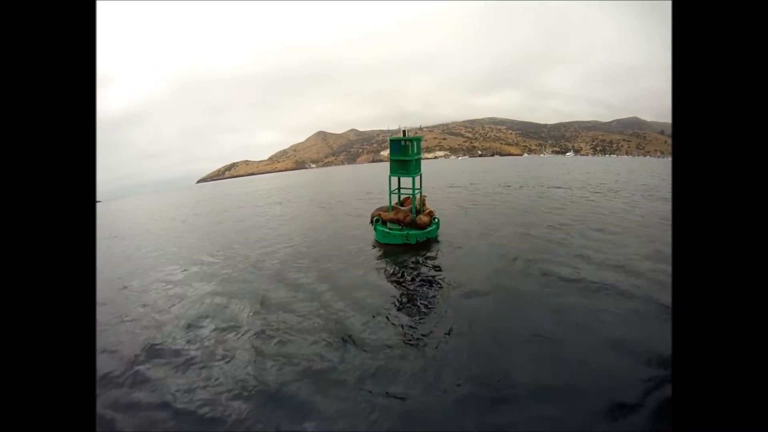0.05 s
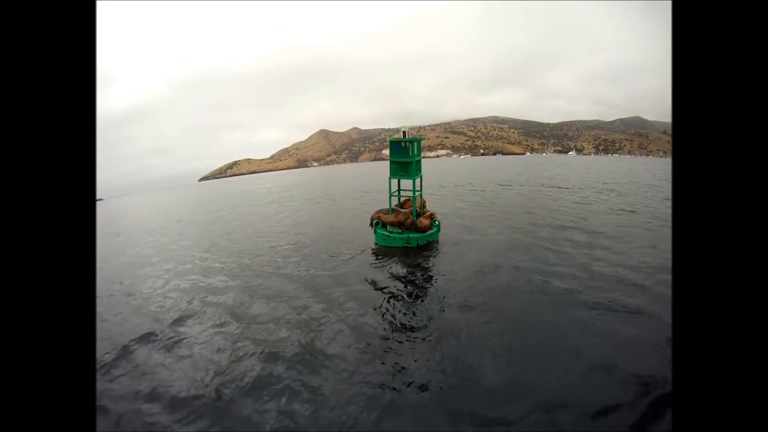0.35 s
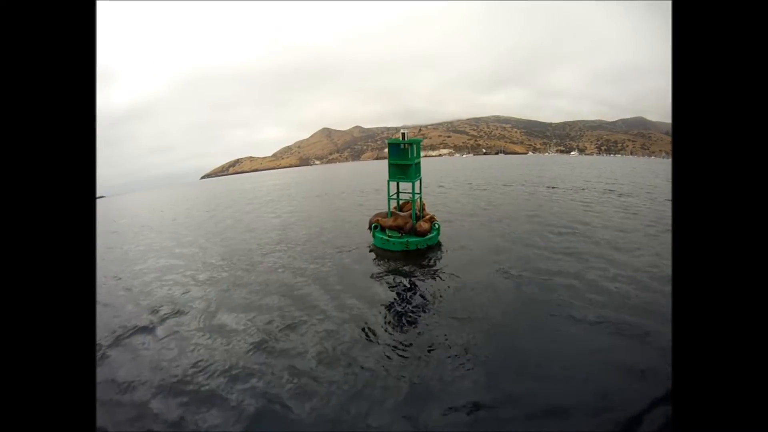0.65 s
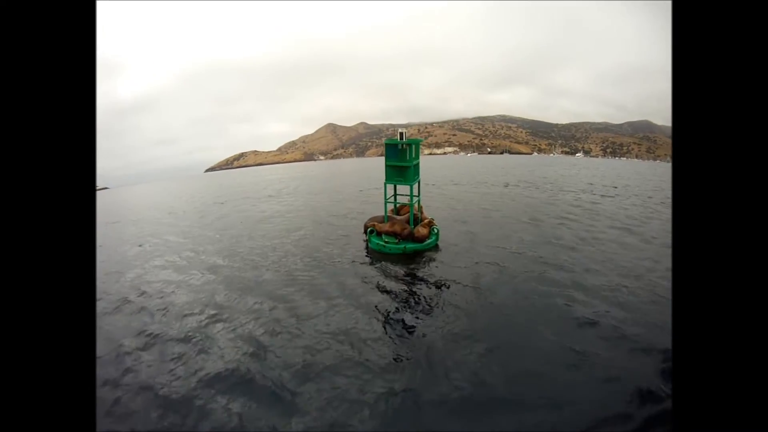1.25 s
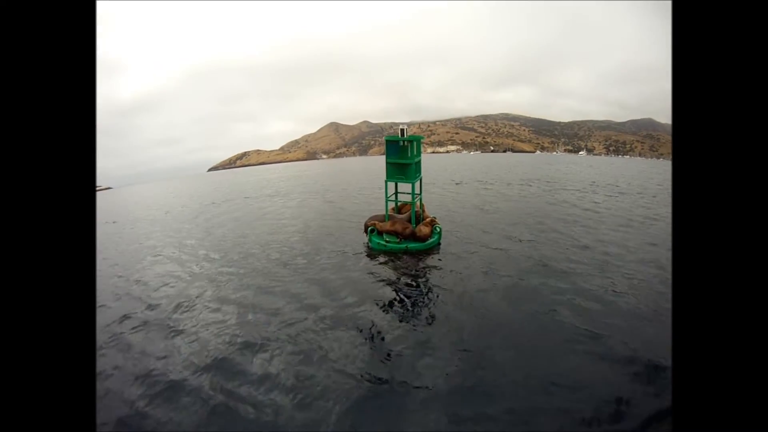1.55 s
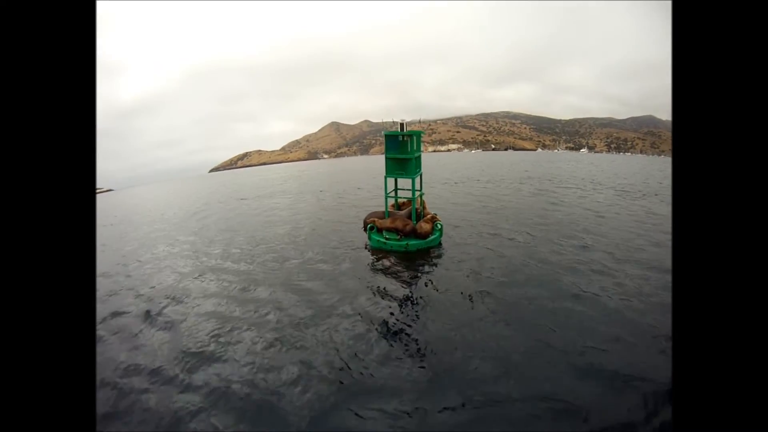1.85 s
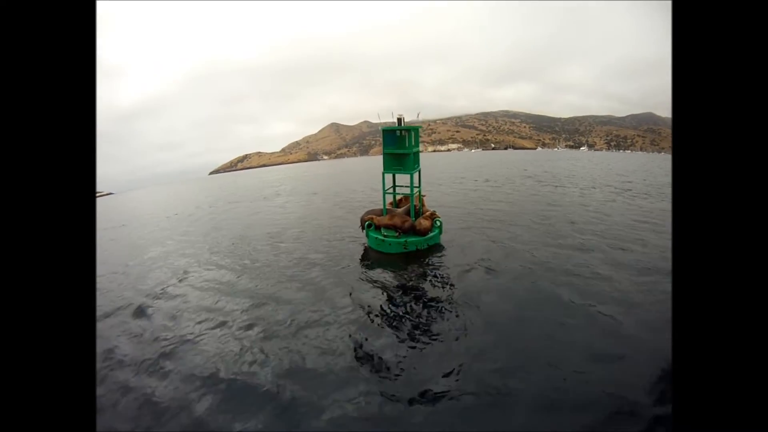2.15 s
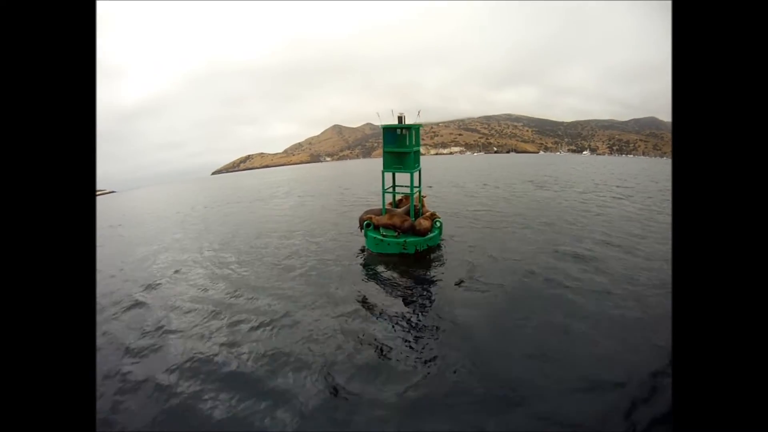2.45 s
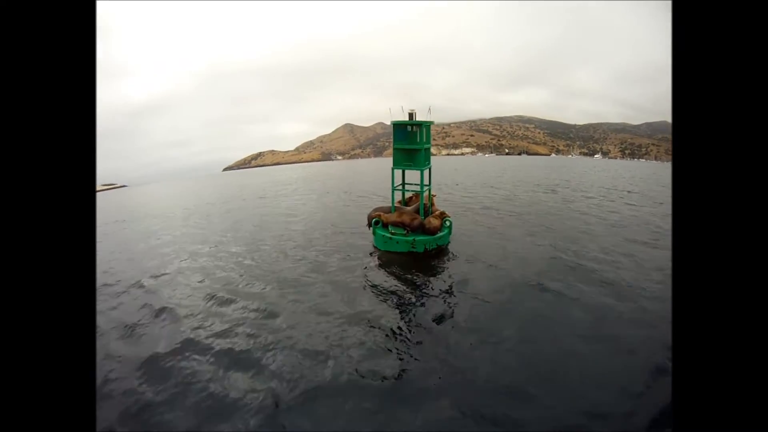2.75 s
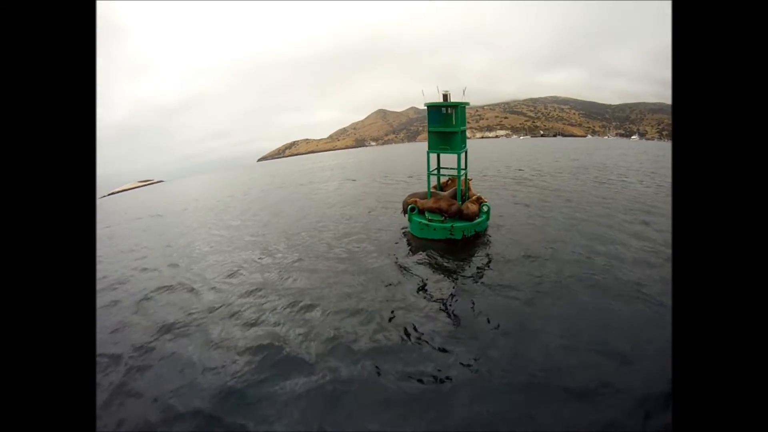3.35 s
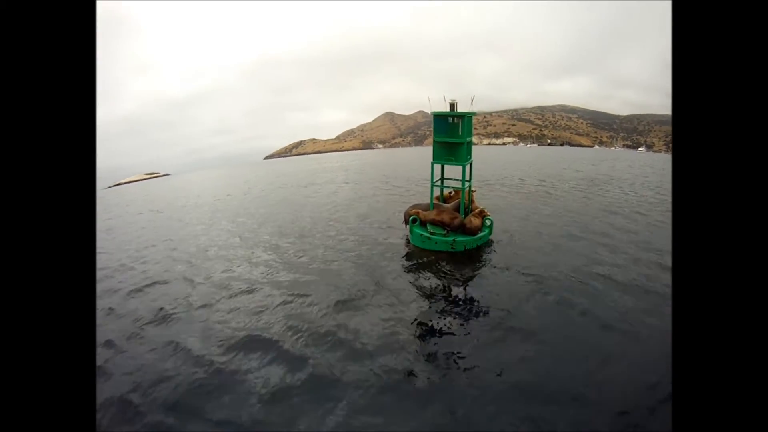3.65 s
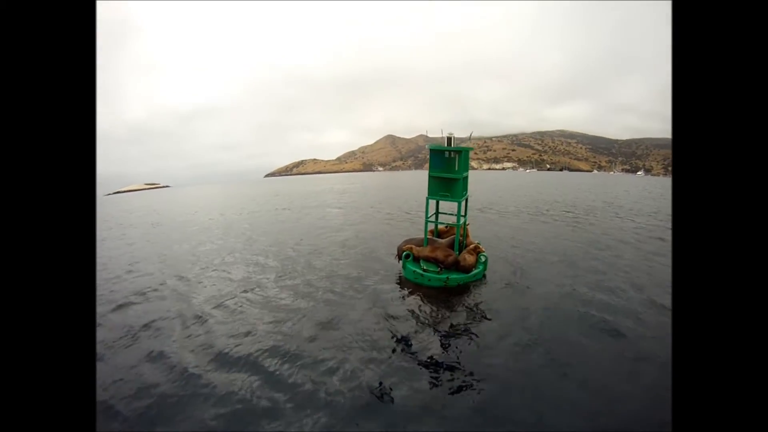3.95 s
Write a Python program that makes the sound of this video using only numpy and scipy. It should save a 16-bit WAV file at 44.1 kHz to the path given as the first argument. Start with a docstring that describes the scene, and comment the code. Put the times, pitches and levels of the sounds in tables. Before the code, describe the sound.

Sea lions bark from a buoy across calm water: five short barks, with a deeper animal joining twice. Then louder knocks, scrapes and thumps come from handling right at the microphone, over a faint hum and wash of water and wind.

```python
"""Sea lions on a buoy, heard across calm water: one gives five barks that dip in pitch, and a deeper
one joins in twice. Their jittering vocal folds and rasping breath are shaped by throat and mouth.
Right at the microphone the camera mount hums at a low resonance; near the end a hand shifts on it,
and the housing knocks, scrapes and thumps. A quiet wash of water and wind lies behind it all.
The recorder holds each sample at a low rate, which mirrors every sound faintly into the treble."""
import sys
import numpy as np
from scipy import signal
from scipy.fft import rfft, irfft, next_fast_len
from scipy.io import wavfile

SR = 44100
rng = np.random.default_rng(int(sys.argv[2]) if len(sys.argv) > 2 else 0)


def transcribe(u):
    """Save the signal u as a 16-bit wav file named by the first command-line argument.

    u: samples, shape (n,) or (channels, n), limited to [-1, 1]; the rate is SR.
    q: integer samples, one column per channel.
    """
    v = np.clip(np.atleast_2d(u).T, -1, 1)
    q = np.round(v * 32767).astype(np.int16)
    wavfile.write(sys.argv[1], SR, q)


N = 176400
TIME = np.arange(N) / SR

# Resonances of a sea lion's throat. Each row: frequency in Hz, relative gain in dB.
THROAT_RESPONSE = [(300, -19), (700, -27), (920, 5.5), (1150, 5), (1300, 3), (1420, -8.5), (1690, -21),
                   (1880, -3), (2400, -3.5), (2750, -16), (3720, -13.5), (4700, -27)]


def sea_lions():
    """Both animals out on the buoy, with a faint scatter from buoy and water."""
    # Each row: start and length in seconds, lowest pitch in Hz, opening drop as a share of that pitch,
    # lower band level, fundamental level, open-mouth gain and treble gain in dB, release and time of
    # the sag in seconds, sag and rasp in dB, time of the shrill edge in seconds, its level in dB.
    barks = [(0.829, 0.098, 484.5, 0.21, -35.5, -44, -0.5, -11.5, 0.049, 0.84, -11, -34, .83, -72),
             (1.183, 0.18, 451.8, 0.32, -43, -48.5, 4, -5.5, 0.053, 1.29, 0, -11.5, 1.29, -64),
             (1.586, 0.23, 458.6, 0.22, -40, -46.5, 9, -1, 0.061, 1.695, -3, -15.5, 1.627, -52),
             (2.001, 0.175, 448.8, .39, -39.5, -42.5, -3, -2, 0.046, 2.078, -3, -14, 2.115, -59),
             (2.432, 0.17, 438.8, .34, -44.5, -44.5, 2.5, 2.5, 0.028, 2.51, -4, -11.5, 2.46, -56.5)]
    # Each row: start and length in seconds, lowest pitch in Hz, level in dB, mouth resonance in Hz.
    deep_calls = [(0.784, 0.087, 358.4, -33.5, 1097), (1.694, 0.19, 373.8, -43.5, 685)]
    calls = np.zeros(N)
    for row in barks:
        add(calls, *bark(*row))
    for row in deep_calls:
        add(calls, *deep_call(*row))
    scatter_db, scatter_t60_s = -13.5, 0.23
    t = TIME[:SR // 2]
    tail = rng.standard_normal(len(t)) * amp(-60 * t / scatter_t60_s)
    return calls + amp(scatter_db) * signal.fftconvolve(calls, tail / np.linalg.norm(tail))[:N]


def bark(start, length, low_hz, drop, db, chest_db, open_db, treble_db,
         release_s, sag_s, sag_db, rasp_db, edge_s, edge_db):
    """The pitch drops and climbs again; the opening mouth moves weight from fundamental to overtones."""
    t = np.arange(0, length, 1 / SR)
    attack_s, flare_s, split_hz, rolloff_hz = 0.014, 0.027, 1700, 2740

    def gate(lag_s):
        ramp = np.minimum((t - lag_s) / attack_s, (length - lag_s - t) / release_s)
        return np.sin(np.pi / 2 * np.clip(ramp, 0, 1)) ** 2

    bottom = 0.35  # share of the bark gone by at its lowest pitch
    past = t / length - bottom
    fall = drop * abs(past / bottom) ** 1.9
    rise = 0.42 * abs(past / past.max()) ** 1.5
    partials, waves, puffs = vocal_folds(low_hz * (1 + np.where(past < 0, fall, rise)))
    mouth = bell(past, 0.15)
    sag = sag_db * bell(start + t - sag_s, flare_s)  # the voice sags and leaves its rasp
    chest = amp(chest_db - 16 * mouth) * waves[0]
    shrill = unit_rms(colour(puffs, lambda f: bell(f - 3717, 100)))
    edge = amp(edge_db) * bell(start + t - edge_s, flare_s) * shrill
    out = gate(0) * (chest + edge)
    # The treble opens later, shuts earlier and sags further than the band below the split.
    lower = (-2.9, db, 0.0025, sag + open_db * mouth, rasp_db)
    treble = (0.3, db + treble_db, 0.011, 4.3 * sag, rasp_db + 4.5)
    for slope, band_db, lag_s, voice_db, breath_db in (lower, treble):
        throat = lambda f: gain_at(THROAT_RESPONSE, f) * (1 + np.tanh(slope * (f - split_hz) / 80))
        gains = throat(partials) / np.hypot(1, (partials / rolloff_hz) ** 4)
        voice = amp(voice_db) * (gains * waves).sum(0) / np.linalg.norm(gains, axis=0)
        breath = amp(breath_db) * unit_rms(colour(puffs, throat))
        out += amp(band_db) * gate(lag_s) * (voice + breath)
    return start, out


def deep_call(start, length, low_hz, db, mouth_hz):
    """A rounder call that also dips in pitch; the mouth picks out one harmonic over a light rasp."""
    progress = np.arange(0, length, 1 / SR) / length
    partials, waves, puffs = vocal_folds(low_hz * (1 + 0.112 * (2 * progress - 1) ** 2))
    mouth = 1 / (1 + ((partials - mouth_hz) / 187) ** 4)
    upper = amp(-16) / (1 + ((partials - 2207) / 290) ** 4)
    chest = amp(-17.5) * (low_hz / partials) ** 2
    voice = unit_rms(((mouth + upper + chest) * waves).sum(0))
    rasp = amp(-12.5) * unit_rms(colour(puffs, lambda f: gain_at(THROAT_RESPONSE, f)))
    return start, amp(db) * np.sin(np.pi * progress) ** 0.69 * (voice + rasp)


def vocal_folds(hz):
    """Jittering folds: the frequencies and waves of twelve harmonics, and a puff of air per cycle."""
    size, harmonics = len(hz), np.arange(1, 13)
    jitter = 1 + 0.021 * wander(size, hz=304)
    phase = 2 * np.pi * np.cumsum(hz * jitter) / SR
    waves = []
    for n in harmonics:
        wave = np.cos(n * phase + rng.uniform(0, 2 * np.pi))
        flutter = 1 + 0.34 * wander(size, hz=60)
        waves.append(wave * flutter)
    puffs = (1 + 2 * np.cos(phase)) * rng.standard_normal(size)
    return harmonics[:, None] * hz, np.sqrt(2) * np.array(waves), puffs


def handling():
    """Knocks, dry ticks and thumps that reach the microphone through housing and mount."""
    # Each row: start in seconds, level in dB, scraping time in seconds, brightness in dB per octave.
    knocks = [(0.145, -44.5, 0.0012, -12), (3.2357, -9.5, 0.00059, 1), (3.299, -26, 0.0032, 2.5),
              (3.423, -31, 0.0035, -6), (3.4603, -9.5, 0.0009, 2), (3.516, -29, 0.00081, 2),
              (3.554, -23.5, 0.0024, -5), (3.574, -30.5, 0.0011, -1), (3.6169, -20, 0.0027, -2.5),
              (3.646, -22.5, 0.001, -7.5), (3.712, -18.5, 0.0027, 2), (3.727, -29, 0.0045, 0),
              (3.742, -23, 0.0014, -2), (3.7615, -13.5, 0.00078, -1.5), (3.8283, -16.5, 0.0024, -6.5)]
    # Each row: start in seconds, peak level in dB.
    ticks = [(3.313, -36), (3.407, -43), (3.932, -45)]
    # Each row: time of the peak in seconds, peak level in dB, nominal pitch in Hz.
    thumps = [(0.149, -43.5, 169), (3.271, -21, 60.5), (3.3124, -5, 129), (3.4723, -13.5, 124),
              (3.531, -21.5, 69.4), (3.6255, -17, 112), (3.738, -15.5, 96), (3.7726, -16, 135),
              (3.8447, -16, 112), (3.908, -10.5, 91)]
    out = np.zeros(N)
    for row in knocks:
        add(out, *knock(*row))
    for start, db in ticks:
        add(out, start, amp(db) * crack())
    for row in thumps:
        add(out, *thump(*row))
    return out


def knock(start, db, scrape_s, tilt_db):
    """A tap cracks, and with a short scrape rings the housing, tuned a little differently by each grip."""
    snap = crack()
    t = TIME[:len(snap)]
    force = 0.44 * rng.standard_normal(len(t)) * np.exp(-t / scrape_s) * t / scrape_s
    force[0] += 1  # the tap itself
    tuning = np.exp(0.038 * rng.standard_normal())
    body = signal.fftconvolve(force, housing(tilt_db, tuning))[:len(t)]
    return start, amp(db) * (body / abs(body).max() + amp(-25) * snap)


def crack():
    """A bright snap of peak 1 that dies within a few milliseconds."""
    t = TIME[:SR // 20]
    snap = rng.standard_normal(len(t)) * np.exp(-t / 0.0018)
    return snap / abs(snap).max()


def housing(tilt_db=0, tuning=1):
    """The short ring of the housing: it builds up quickly, and its treble is damped."""
    # Each row: frequency in Hz, relative level in dB, seconds to fall 60 dB.
    housing_modes = [(520, -10, 0.015), (757, -8.5, 0.027), (1003, -2, 0.021), (1190, -0.5, 0.019),
                     (2002, 8.5, 0.012), (2330, -7.5, 0.026), (3770, -1.5, 0.0057)]
    swell_s, damping_hz = 0.00033, 2740
    sound = ring([(hz * tuning, db, t60) for hz, db, t60 in housing_modes], 0.05, tilt_db)
    sound *= 1 - bell(TIME[:len(sound)], swell_s)
    return signal.sosfilt(signal.butter(4, damping_hz, fs=SR, output="sos"), sound)


def thump(peak_s, db, hz):
    """A soft push: the mount swings up, then slows and settles within a few cycles."""
    cycles = TIME[:SR // 10] * hz
    swing = -cycles ** 2 * np.exp(-cycles / 0.31) * np.sin(2 * np.pi * cycles ** 0.74)
    return peak_s - swing.argmax() / SR, amp(db) * swing / swing.max()


def hand_rub():
    """Tiny slips of the hand ring the housing while the mount shudders under it."""
    # Each row of both: time in seconds, level in dB.
    rub_levels = [(3.236, -45), (3.3, -42.5), (3.39, -50.5), (3.69, -45), (3.74, -38.5), (3.82, -42.5),
                  (3.87, -47.5), (4.0, -67)]
    shudder_levels = [(3.05, -78), (3.261, -32.5), (3.691, -37), (3.76, -19.5), (3.86, -30), (4.0, -46.5)]
    # Each row: frequency in Hz, relative level in dB, seconds to fall 60 dB.
    mount_modes = [(72.7, 4, 0.12), (99.5, 4.5, 0.11), (137.1, -1.5, 0.36), (248, -4.5, 0.072)]
    slips_per_s = 2400
    slips = (rng.random(N) < slips_per_s / SR) * rng.standard_normal(N)
    rub = (slips, housing(), rub_levels)
    shudder = (rng.standard_normal(N), ring(mount_modes, 0.25), shudder_levels)
    out = np.zeros(N)
    for force, body, levels in (rub, shudder):
        begun = TIME > levels[0][0]
        out += unit_rms(signal.fftconvolve(force, body)[:N]) * envelope(levels) * begun
    return out


def mount_hum():
    """The lowest resonance of the mount swells and wavers, close under the microphone."""
    # Each row: time in seconds, level in dB.
    hum_levels = [(0.13, -39.5), (0.27, -58.5), (0.44, -34), (0.72, -41), (0.98, -33.5), (1.3, -44),
                  (1.44, -29.5), (1.6, -42.5), (2.37, -39.5), (2.43, -31), (2.6, -26.5), (2.68, -36),
                  (2.8, -31), (2.92, -38.5), (3.2, -34)]
    hum_hz = 68.1
    waver = 1 + 0.16 * (wander(N, hz=14) + 1j * wander(N, hz=14))  # in both level and phase
    return np.sqrt(2) * envelope(hum_levels) * (waver * np.exp(2j * np.pi * hum_hz * TIME)).real


def open_water():
    """A quiet, even wash of water and wind in the background."""
    # Each row: frequency in Hz, relative noise density in dB.
    wash_spectrum = [(20, -1.5), (115, 4), (160, -9.5), (300, -14), (450, -23.5), (800, -26.5), (1170, -21),
                     (1600, -30), (2120, -22.5), (2900, -33), (5500, -34.5)]
    # Each row: time in seconds, level in dB.
    wash_levels = [(0, -48), (4, -46.5)]
    wash = colour(rng.standard_normal(N), lambda f: gain_at(wash_spectrum, f))
    return envelope(wash_levels) * unit_rms(wash)


def ring(modes, length, tilt_db=0):
    """Dying sines of a struck object, tilted in dB per octave about its loudest mode."""
    t = np.arange(0, length, 1 / SR)
    loudest_hz = max(modes, key=lambda mode: mode[1])[0]
    return sum(amp(db + tilt_db * np.log2(hz / loudest_hz) - 60 * t / t60) * np.sin(2 * np.pi * hz * t)
               for hz, db, t60 in modes)


def wander(size, hz):
    """Smooth random drift of unit RMS, up to about the given rate."""
    return unit_rms(colour(rng.standard_normal(size), lambda f: bell(f, hz)))


def colour(x, gain):
    """Filters x by a gain given as a function of frequency."""
    size = next_fast_len(len(x) + 2048)
    return irfft(rfft(x, size) * gain(np.fft.rfftfreq(size, 1 / SR)), size)[:len(x)]


def gain_at(spectrum, hz):
    points_hz, db = np.transpose(spectrum)
    return amp(np.interp(np.log(hz + 1), np.log(points_hz), db))


def envelope(levels):
    return amp(np.interp(TIME, *np.transpose(levels)))


def amp(db):
    return 10 ** (np.asarray(db) / 20)


def unit_rms(x):
    return x / np.sqrt(np.mean(x ** 2) + 1e-20)


def bell(x, width):
    return np.exp(-(x / width) ** 2)


def add(mix, start, sound):
    part = mix[max(round(start * SR), 0):][:len(sound)]
    part += sound[:len(part)]


def scene():
    """The buoy, the camera and the open water at one microphone."""
    return (sea_lions() + handling() + hand_rub() + mount_hum() + open_water())[None]


def record(dry):
    """The recorder limits the band, then holds each sample, mirroring the sound about the hold rate."""
    input_cutoff_hz, hold_hz, output_cutoff_hz = 5750, 12000, 15400
    limited = signal.oaconvolve(dry[0], signal.firwin(127, input_cutoff_hz, fs=SR), "same")
    mirrored = limited * (1 + 2 * np.cos(2 * np.pi * hold_hz * TIME))
    held = colour(mirrored, lambda f: np.sinc(f / hold_hz))
    lowpass = signal.firwin(255, output_cutoff_hz, window=("kaiser", 9), fs=SR)
    return signal.oaconvolve(held, lowpass, "same")[None]


dry = scene()
out = record(dry)
transcribe(out)
```